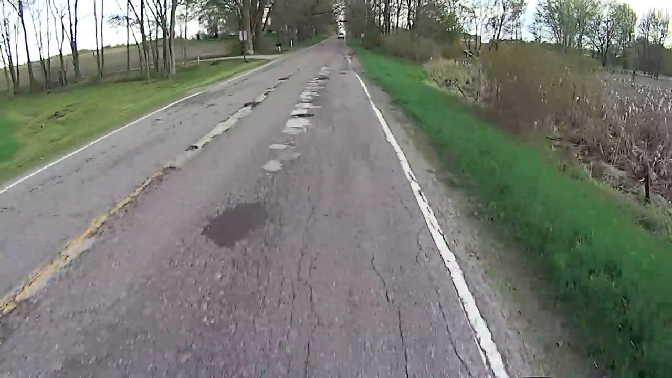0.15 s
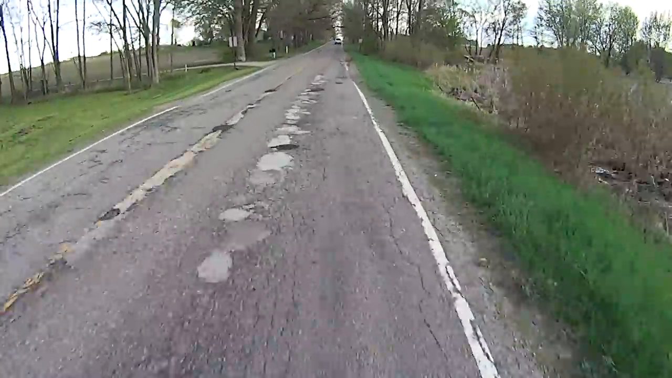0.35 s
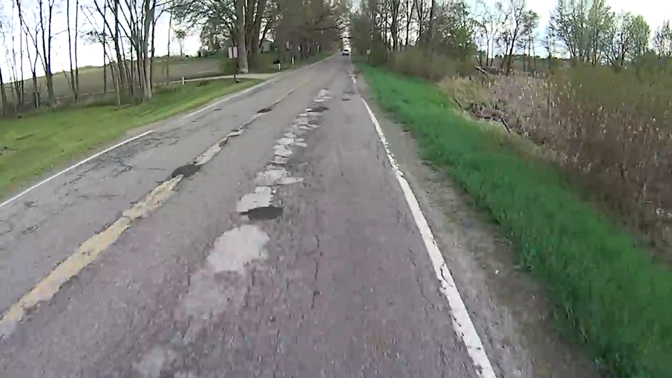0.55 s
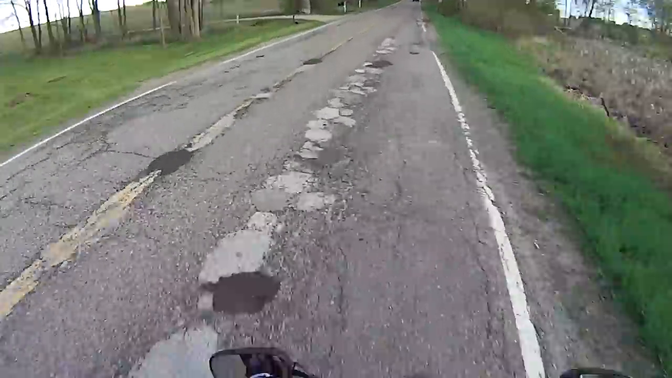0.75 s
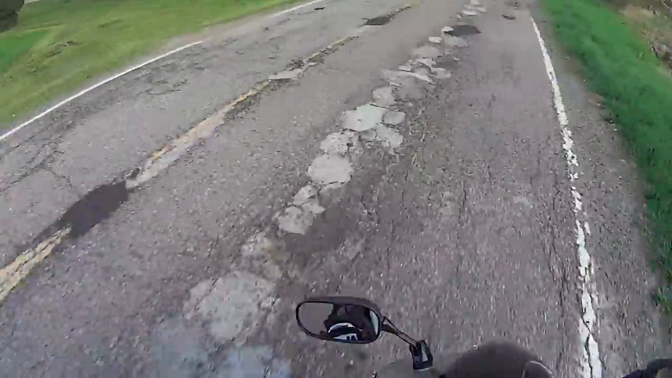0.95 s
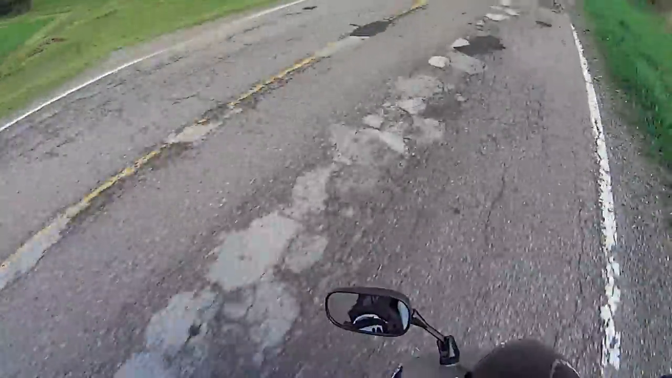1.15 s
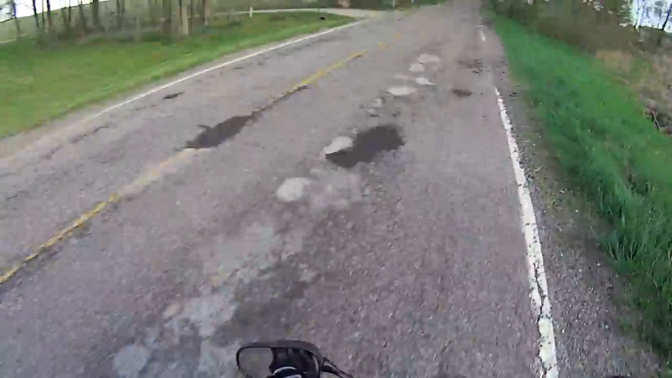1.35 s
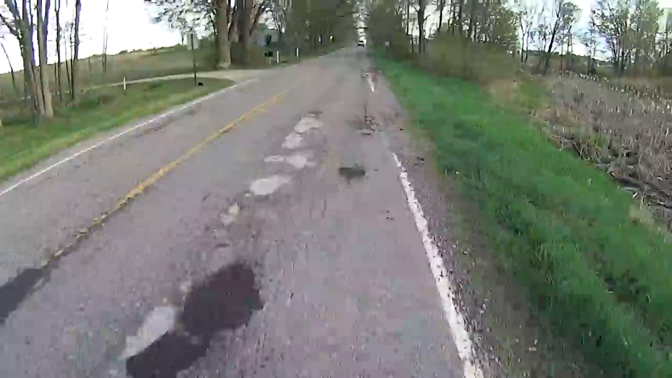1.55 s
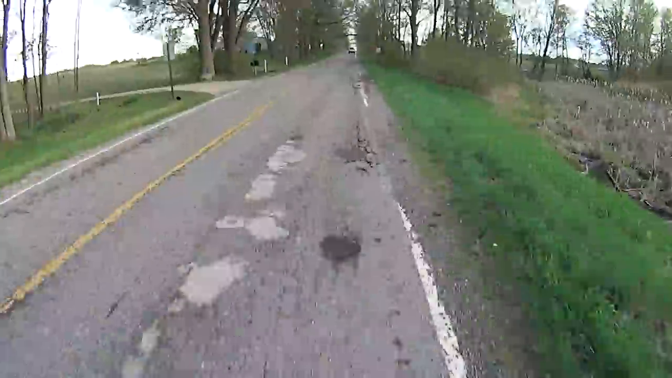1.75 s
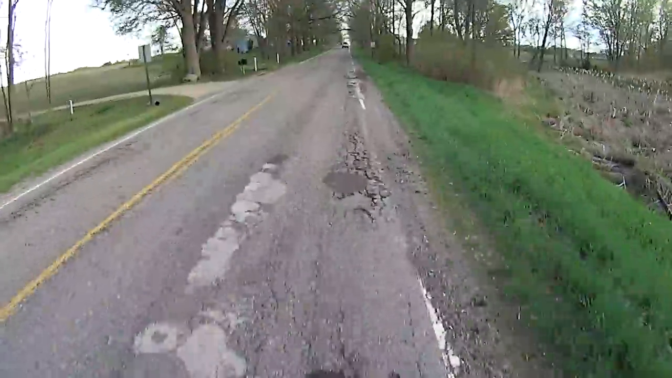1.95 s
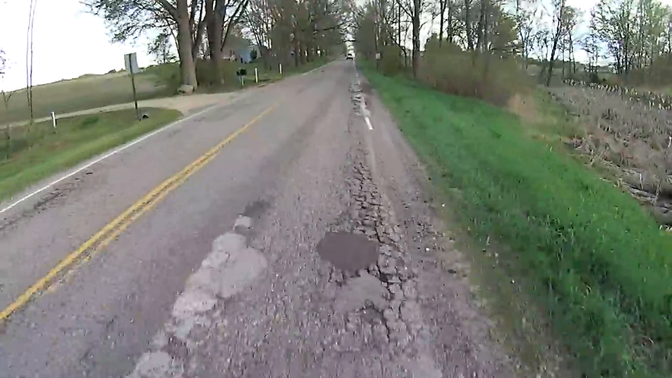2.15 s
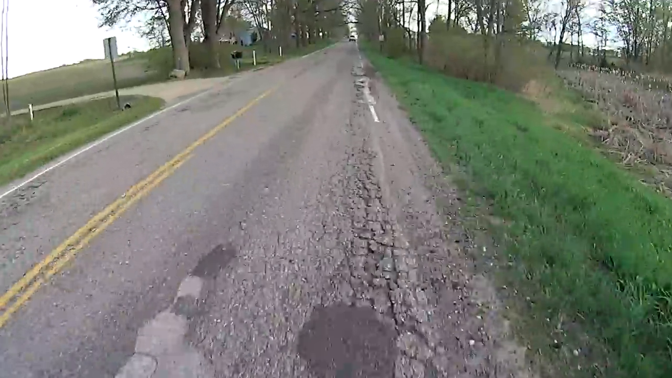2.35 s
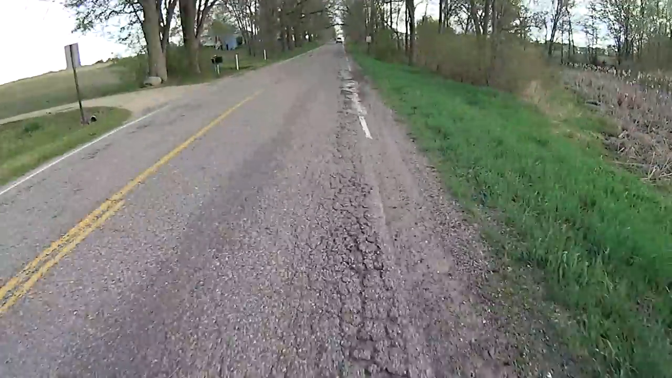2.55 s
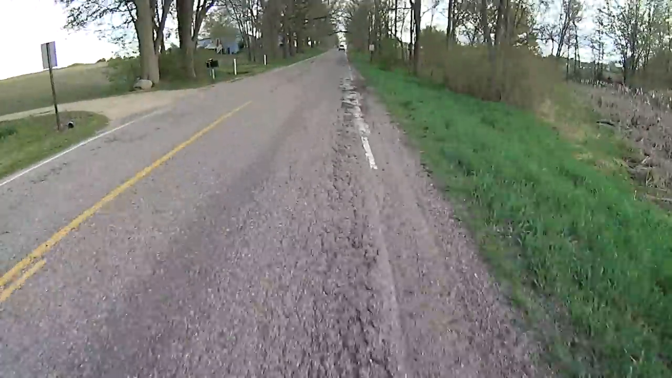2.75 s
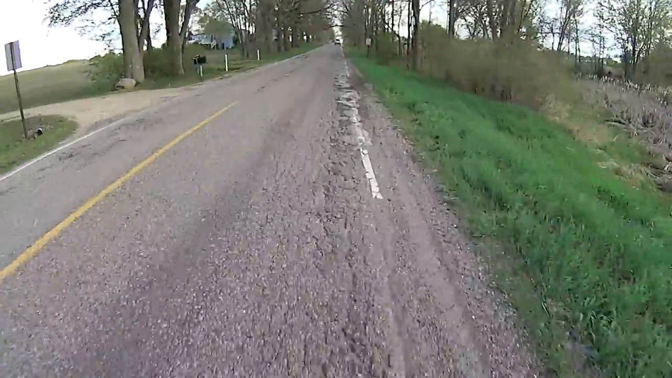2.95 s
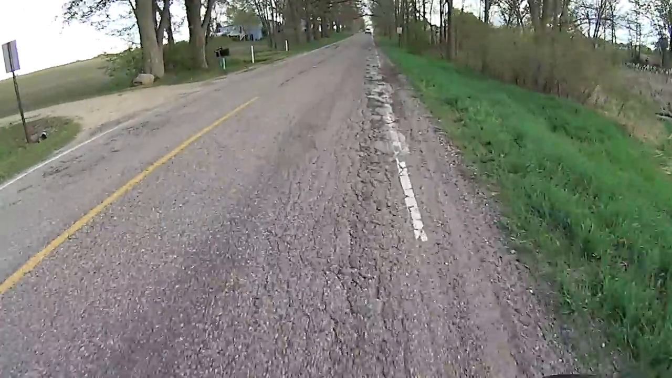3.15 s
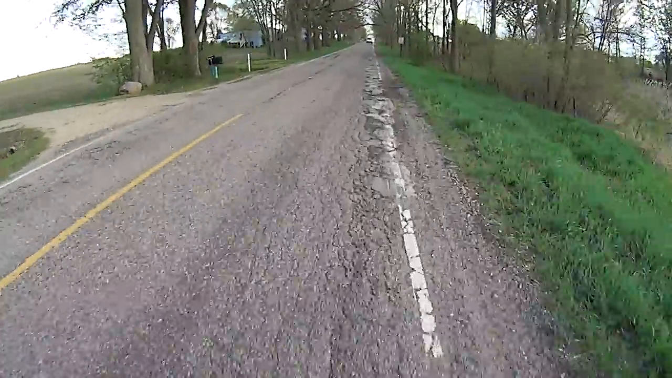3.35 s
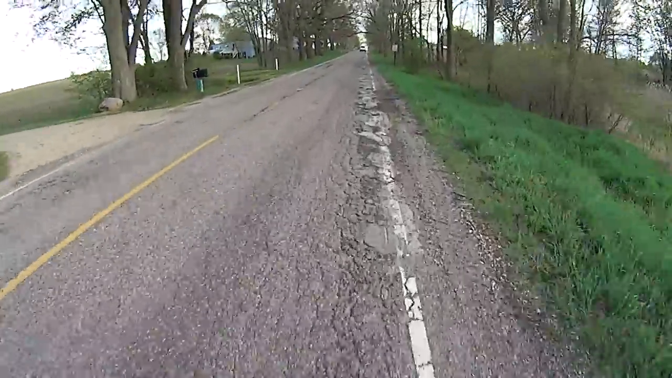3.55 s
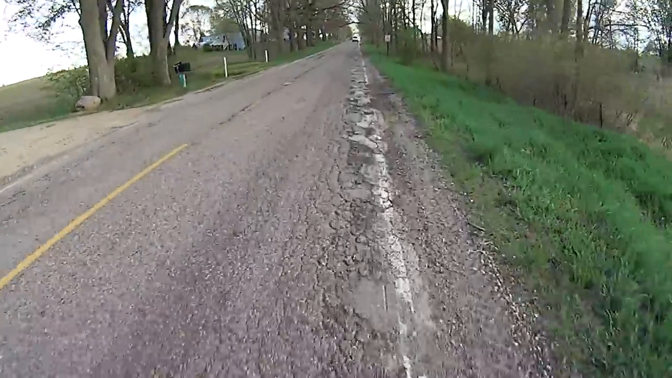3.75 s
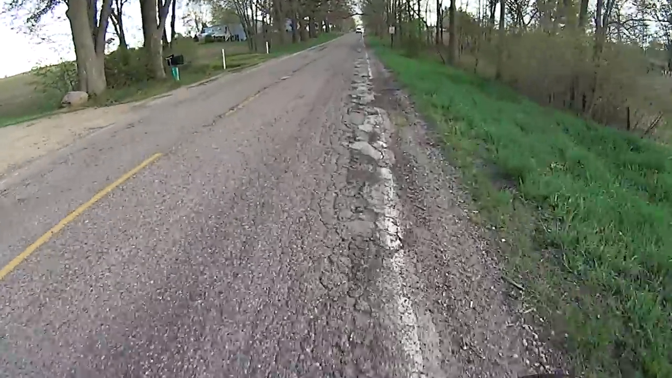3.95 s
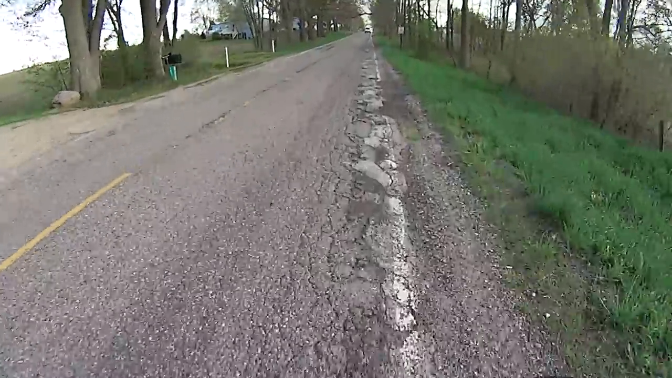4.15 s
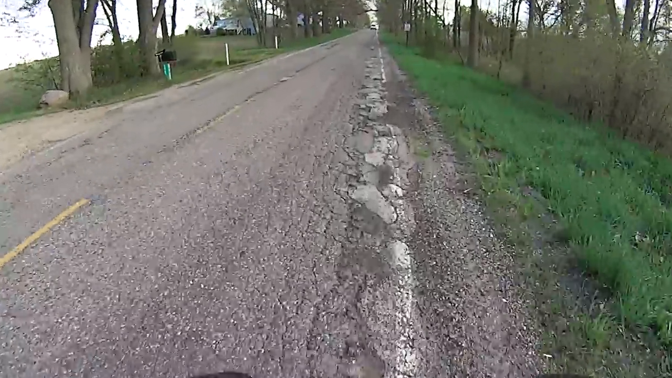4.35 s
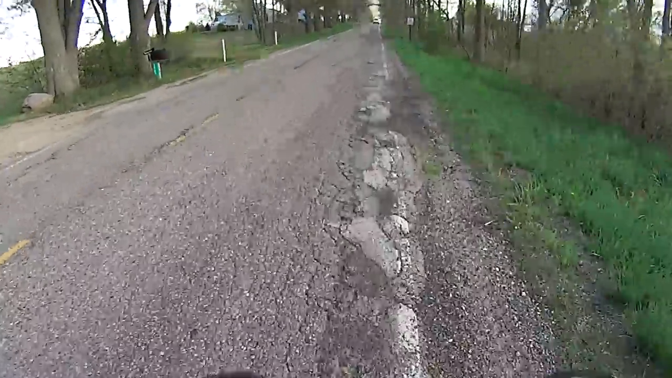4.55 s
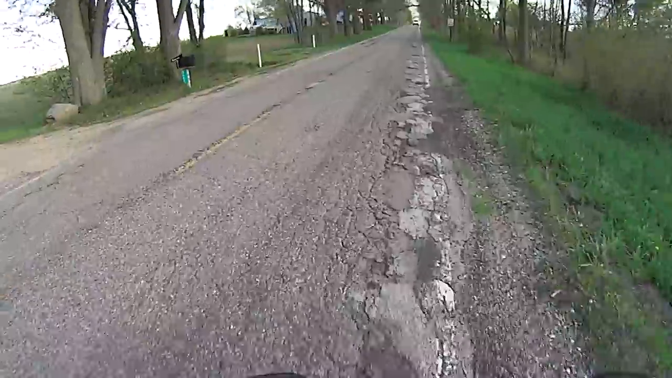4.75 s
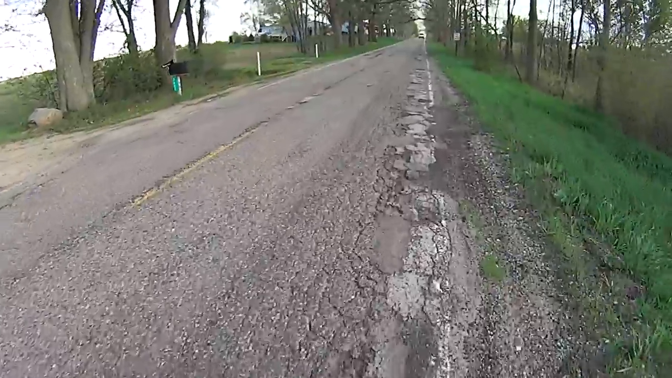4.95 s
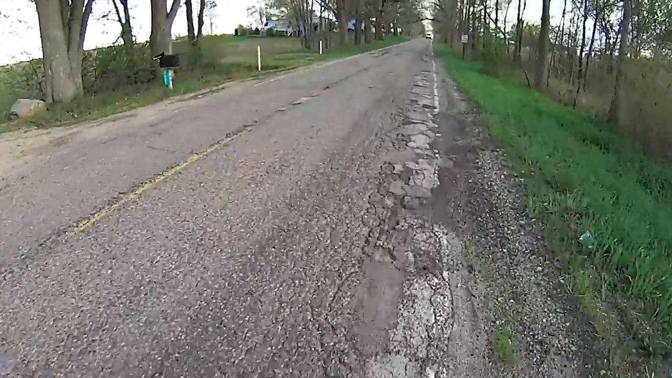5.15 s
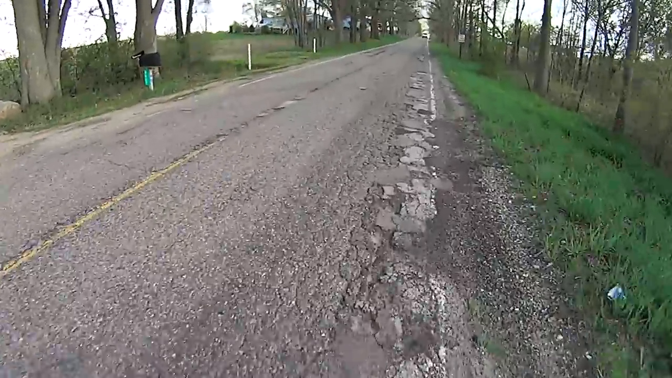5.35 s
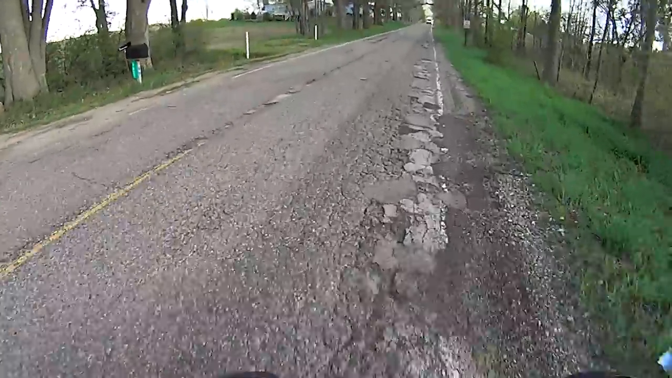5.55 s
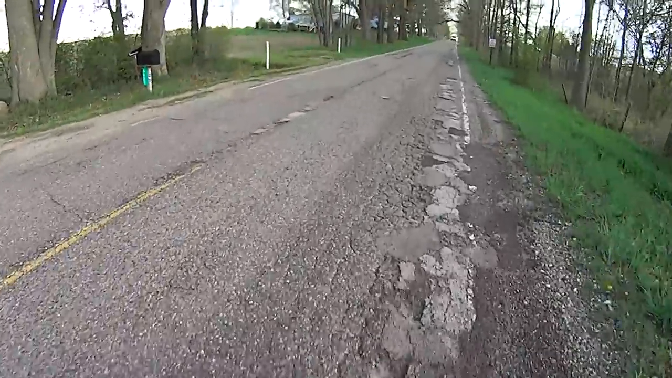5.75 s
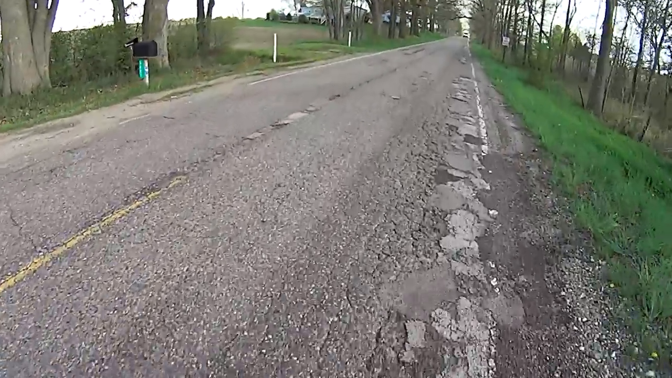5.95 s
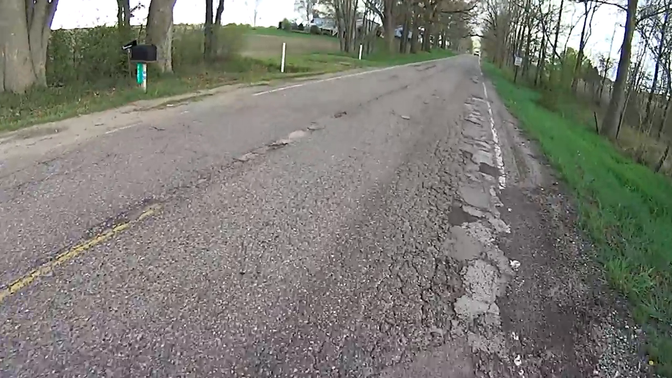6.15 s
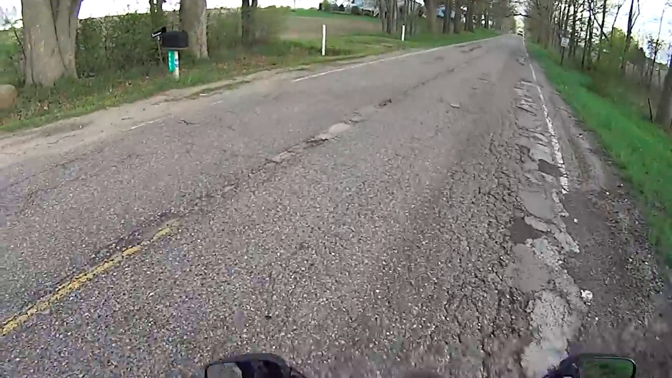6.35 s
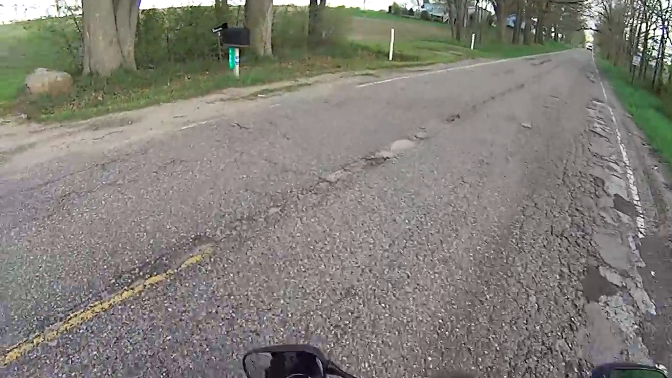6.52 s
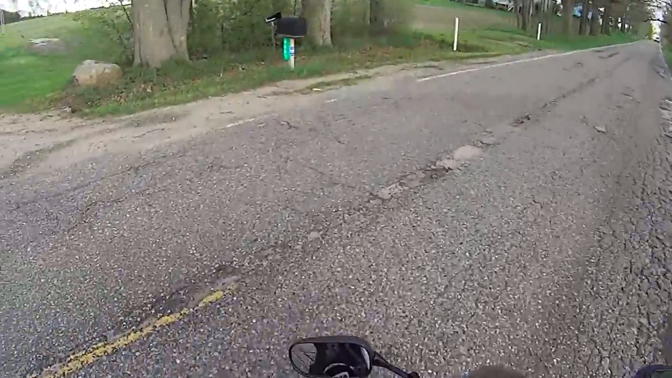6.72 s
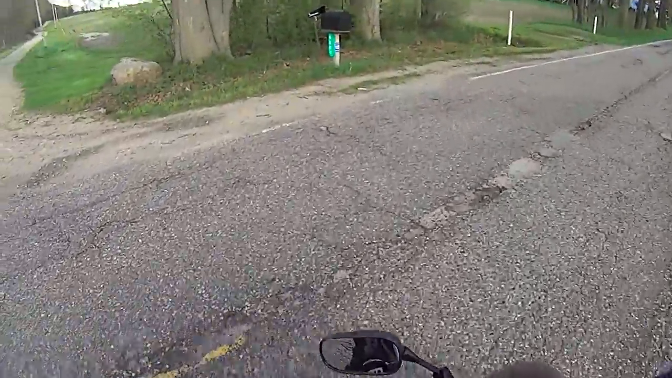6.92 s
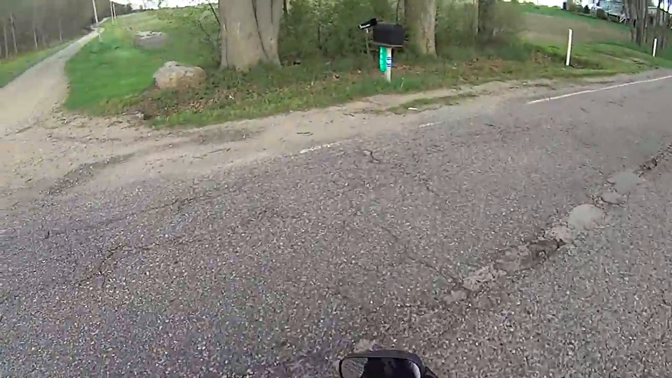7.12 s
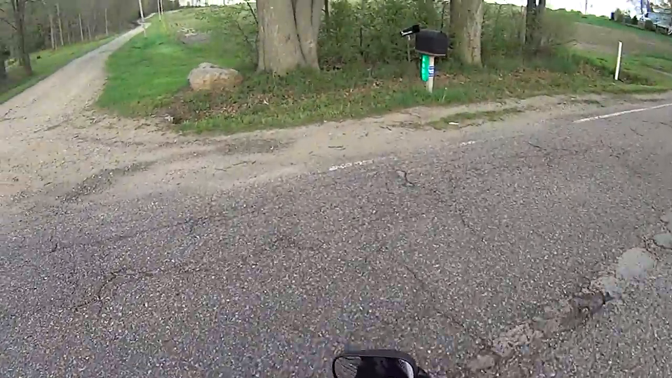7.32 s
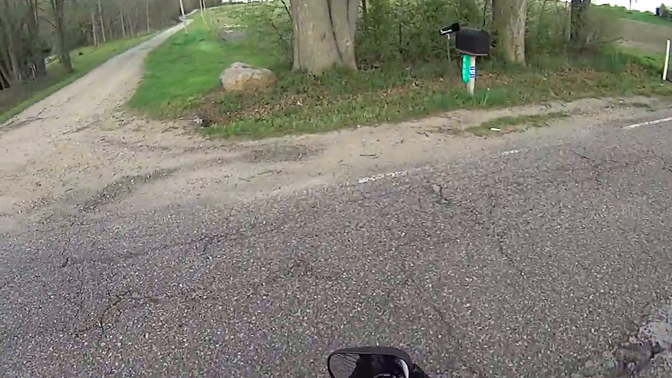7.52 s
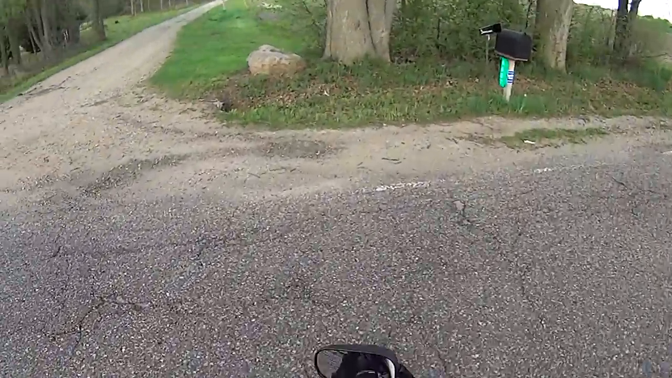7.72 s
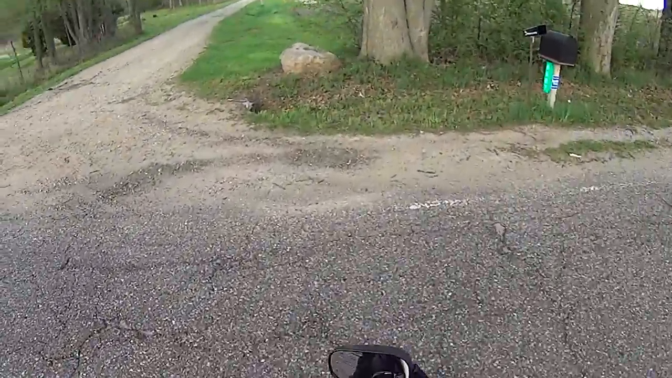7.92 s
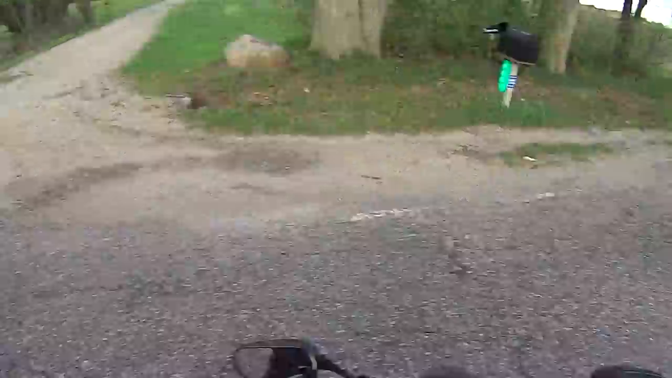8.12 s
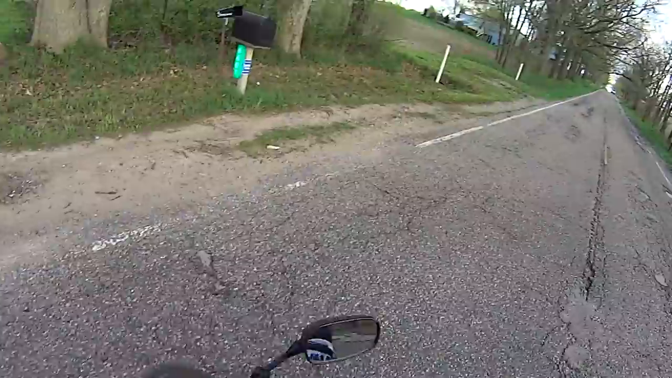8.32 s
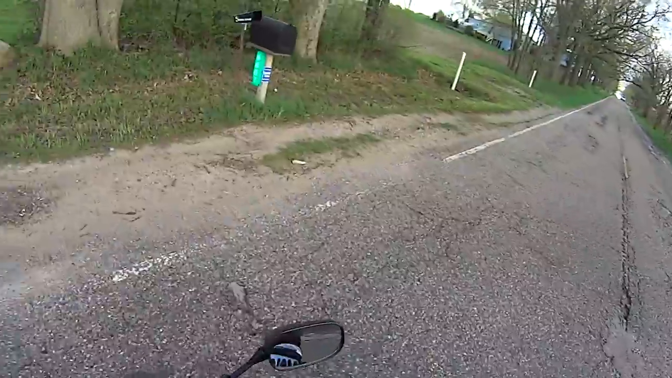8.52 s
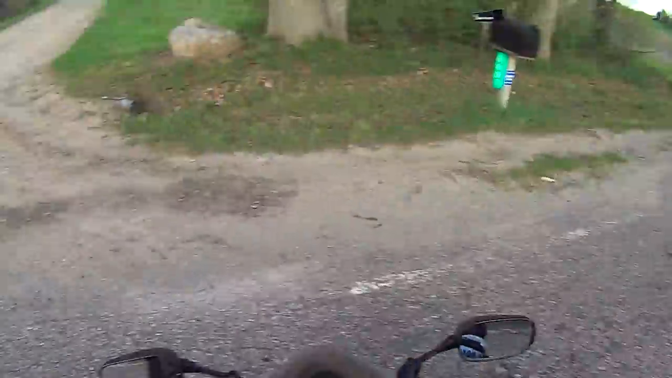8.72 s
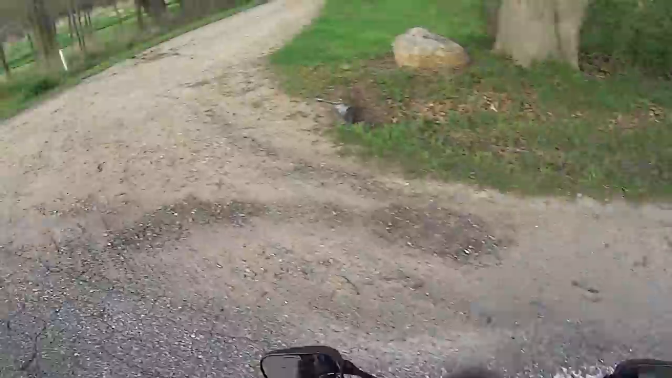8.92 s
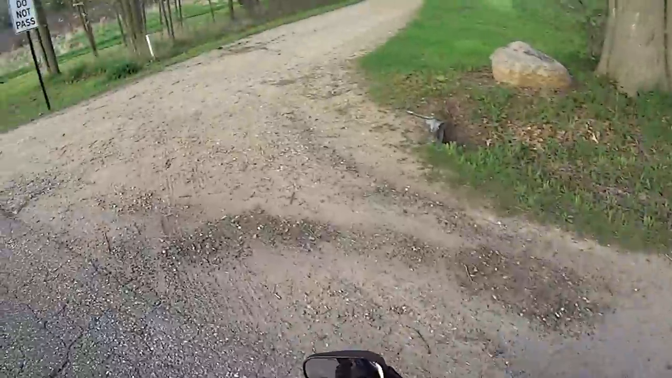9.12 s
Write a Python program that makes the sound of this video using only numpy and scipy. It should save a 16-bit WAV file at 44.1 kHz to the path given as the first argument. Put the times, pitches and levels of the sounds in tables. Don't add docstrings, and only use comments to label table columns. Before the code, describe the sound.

Fluttering air roars and whistles around a hard case, then dies to a thin swirl as a motorcycle brakes, with bumps, rattles and idling hum.

```python
import sys
import numpy as np
from scipy import signal
from scipy.fft import rfft, irfft, next_fast_len
from scipy.io import wavfile
from scipy.ndimage import uniform_filter1d

SR = 44100
rng = np.random.default_rng(int(sys.argv[2]) if len(sys.argv) > 2 else 0)


def elevation(decibels):
    levels = np.asarray(decibels, float)
    return 10 ** (levels / 20)


def transcribe(u):
    v = np.clip(np.atleast_2d(u).T, -1, 1)
    q = np.round(v * 32767).astype(np.int16)
    wavfile.write(sys.argv[1], SR, q)


N = 404827
TIME = np.arange(N) / SR
OPPOSED = np.array([[1], [-1]])


def unit(x):
    return x / np.sqrt(np.mean(x ** 2))


def walk(rate):
    hold = int(SR / rate)
    steps = np.repeat(rng.standard_normal(N // hold + 1), hold)
    return unit(uniform_filter1d(uniform_filter1d(steps, hold), hold)[:N])


def colour(table, hz):
    f, db = np.transpose(table)
    return elevation(np.interp(np.log(hz), np.log(f), db))


# (frequency [Hz], left minus right level [dB], phase by which the right port leads [rad])
PORTS = [(60, -1, .6), (320, -2, .45), (400, 0, 1.6), (520, 1, 2.4), (800, 1, 1.3), (1040, 2.5, 1.9),
         (1140, 0, .4), (1640, -2, -.1), (2100, -4, 0), (2600, 3, -2.7), (3240, -.5, 0), (4150, 0, -2.3),
         (4660, -1, 0), (5100, -4, 0)]


def ring(drive, modes, order=2):
    size = next_fast_len(len(drive) + SR // 4)
    hz = np.arange(size // 2 + 1) * SR / size
    port_hz, port_pan_db, port_lead = np.transpose(PORTS)
    out = 0
    for f, width, db in modes:
        pan_db = np.interp(f, port_hz, port_pan_db)
        lead = np.interp(f, port_hz, port_lead) * (f < port_hz[-1])
        wide = width / 2 / np.sqrt(2 ** (1 / order) - 1)
        peak = (wide / (wide + 1j * (hz - f))) ** order * np.minimum(hz / f * 2, 1)
        gain = elevation(db + pan_db * OPPOSED / 2)
        out = out + peak * gain * np.array([[1], [np.exp(1j * lead)]])
    return irfft(out * rfft(drive, size), size)[:, :len(drive)]


def rush(modes, db, gate, flicker_db, rate):
    drive = rng.standard_normal(N) * gate * elevation(flicker_db * walk(rate))
    return unit(ring(drive, modes)) * elevation(db)


# (time [s], level [dB])
SWIRL = [(0.0, -25), (0.4, -23.5), (0.65, -25.5), (0.92, -24), (1.2, -24), (1.55, -26), (1.8, -24.5),
         (2.0, -29.5), (2.76, -29.5), (3.63, -31.5), (5.0, -32.5), (6.1, -33), (6.45, -31), (6.85, -32.5),
         (7.45, -35.5), (8.1, -34), (8.6, -32.5), (9.18, -34.5)]


def airflow():
    swirl_db = np.interp(TIME, *np.transpose(SWIRL)) + 32
    braking_s, sag_db_per_s = 1.43, 0.74
    wind_db = 20.5 * np.exp(-TIME / braking_s) - sag_db_per_s * TIME
    start_s, end_s, ease_s = .88, 1.47, 0.035
    glance = (np.tanh((TIME - start_s) / ease_s) - np.tanh((TIME - end_s) / (3 * ease_s))) / 2
    return swirl_db, wind_db, glance


# (time [s], firing rate [Hz], hum level [dB])
ENGINE = [(0.0, 56.2, -48), (0.3, 58, -59), (0.55, 54, -63), (0.8, 57.6, -46), (1.0, 60.4, -42.5),
          (1.28, 58.2, -42.5), (1.5, 54.5, -46.5), (1.62, 57.6, -54.5), (3.8, 56.4, -50.5),
          (4.3, 58.6, -58), (4.6, 55.5, -52), (4.8, 58.2, -57), (6.4, 55.6, -49.5), (7.1, 56.2, -49.5),
          (8.1, 56.1, -52.5), (8.44, 51.6, -51.5), (8.7, 53, -53.5), (8.86, 50.75, -52.5)]
# (multiple of the firing rate, level [dB])
ORDER = [(.5, -11), (1, 0), (1.5, -8), (2, -4.5), (3, -25), (4, -1), (4.5, -9), (5, -2.5), (6, -14)]
# (frequency [Hz], level [dB])
HELMET = [(25, -4), (55, -1), (105, 2), (165, -8), (207, -6), (225, 0), (238, 8), (255, 3), (285, -1),
          (340, -8), (700, -25)]


def engine():
    s, hz, db = np.transpose(ENGINE)
    hz = np.interp(TIME, s, hz) * (1 + 0.0046 * walk(20) + .009 * walk(5))
    phase = 2 * np.pi * np.cumsum(hz) / SR
    hum = 0
    for multiple, order_db in ORDER:
        gain = elevation(order_db + 2.0 * walk(9)) * colour(HELMET, multiple * hz)
        hum = hum + gain * np.sin(multiple * phase + 6 * rng.random())
    level = elevation(uniform_filter1d(np.interp(TIME, s, db), SR // 5))
    return np.sqrt(2) * level * np.array([0.87 * hum, np.roll(hum, -8)]), phase


def clatter_gate(phase):
    return elevation(1.74 * np.cos(phase) + 0.61 * np.cos(phase / 4))


# (frequency [Hz], width [Hz], level [dB])
BUFFET = [(60, 37, -13), (108.7, 45, -2.5), (173.3, 93, -1)]
# (frequency [Hz], width [Hz], level [dB])
SHELL = [(255.4, 62, -4), (447.7, 71, -1), (512, 71, 2), (739.6, 27, -9), (818, 160, -4.5), (1033, 67, 1.5)]
# (frequency [Hz], width [Hz], level [dB])
CAVITY = [(1163, 34, -12), (1505.5, 64, -10.5), (1642.3, 162, 0.5), (1784, 174, -8), (2054, 70, -9.5),
          (2591, 66, -16.5)]
# (frequency [Hz], width [Hz], level [dB])
PORT = [(4632, 116, -6), (4672, 76, -7), (5092, 140, 3), (5204, 216, -1.5)]


def case_air(swirl_db, wind_db, glance, clatter):
    buffet_db = -53 + 1.22 * swirl_db + 0.5 * wind_db + 4.5 * glance
    rumble_db = -41.5 + 0.37 * swirl_db + 0.53 * wind_db
    whistle_db = -50 + .25 * swirl_db + 0.99 * wind_db - 2.5 * glance
    air = rush(BUFFET, buffet_db, 1, 1.7, 7)
    air += rush(SHELL, rumble_db, clatter, 1.87, 11)
    air += rush(CAVITY, swirl_db - 32, clatter, 0.94, 20)
    air += rush(PORT, whistle_db, clatter, 0.67, 14)
    return air, whistle_db


def steady_flow(swirl_db, whistle_db, glance):
    flow_db = .7 * (swirl_db - 32) + 0.36 * (whistle_db + 21.5) + 0.5 * glance
    return uniform_filter1d(flow_db, SR // 4)


# (frequency [Hz], width [Hz], level [dB])
SLOT = [(2770, 670, -8.5), (3183, 210, 5.5), (3300, 80, -6), (4140, 520, -4.5)]
# (frequency [Hz], width [Hz], level [dB])
SEAMS = [(5800, 250, 5), (7110, 520, -1.5), (8170, 180, -15), (9230, 1300, -6.5)]
# (frequency [Hz], width [Hz], level [dB])
CATCH = [(7430, 160, 0.005)]


def gap_air(flow_db, swirl_db, clatter):
    air = rush(SLOT, flow_db - 18.5, clatter, 1.4, 20)
    air += rush(SEAMS, flow_db - 30.5, clatter, 2.6, 14) * OPPOSED
    return air + rush(CATCH, -62.5 + 0.96 * (swirl_db - 8), clatter, 3.5, 12)


# (frequency [Hz], density [dB per Hz])
LEAK = [(30, -6), (130, -22.5), (320, -2.5), (600, -7), (1250, -11), (1650, -1.5), (2350, -4.5),
        (2900, -4.5), (3700, -13.5), (4400, -26), (5700, -14), (6400, -20.5), (9500, -21.5), (10000, -40.5)]


def leak(flow_db):
    air = rfft(rng.standard_normal((2, N)) * elevation(1.64 * walk(14)))
    air = irfft(air * colour(LEAK, np.arange(N // 2 + 1) * SR / N + 1), N)
    hiss = rng.standard_normal((3, N))
    return unit(air) * elevation(flow_db - 12) + elevation(-58.5) * (hiss[0] + 0.62 * hiss[1:])


# (frequency [Hz], rms level [dB])
WHINE = [(6773, -78), (6714, -80)]


def whine():
    return sum(np.sqrt(2) * elevation(db) * np.sin(2 * np.pi * hz * TIME) for hz, db in WHINE)


# (frequency [Hz], width [Hz], level [dB])
VALVES = [(2526, 52, 0)]


def valve_gear(clatter):
    middle_s, half_length_s = 7.7, 0.61
    tipped = np.exp(-((TIME - middle_s) / half_length_s) ** 4)
    return rush(VALVES, -57.5, clatter, 1.5, 5) * OPPOSED * (0.32 + tipped)


# (time [s], peak level [dB], length [s])
BUMPS = [(0.02, -40, .08), (0.25, -28.5, 0.11), (0.4, -34, .1), (0.534, -31, .1), (0.662, -31, 0.085),
         (0.808, -22.5, 0.047), (1.4, -43, .15), (1.7, -45, .25), (1.997, -35, .07), (2.18, -41, 0.23),
         (2.6, -36.5, 0.17), (2.854, -36.5, 0.26), (3.25, -38, 0.13), (3.45, -38, .1), (3.84, -40, 0.086),
         (4.27, -35, .08), (4.42, -24, .05), (4.555, -28, 0.046), (4.69, -36, 0.2), (4.93, -41, 0.12),
         (5.093, -36, .06), (5.303, -33.5, 0.11), (5.47, -36, .06), (5.712, -40, 0.18), (6.24, -30.5, 0.12),
         (6.42, -34, .08), (6.505, -28, 0.14), (6.75, -50, .1), (8.283, -39, 0.071)]


def rocking():
    s, db, length_s = np.array(BUMPS).T[:, :, None]
    t = TIME[::64]
    fall_db = 11.5
    power = np.sum(elevation(db - fall_db * ((t - s) * 2 / length_s) ** 2) ** 2, axis=0)
    return np.interp(TIME, t, power)


# (frequency [Hz], width [Hz], level [dB])
MOUNT = [(30, 13, -11), (70, 11.4, 0)]


def mount_shake(swirl_db, wind_db):
    bumps = rocking()
    tremble_db = -54.5 + .3 * swirl_db + .4 * wind_db
    shake_db = 10 * np.log10(bumps / 2 + elevation(tremble_db) ** 2)
    swing_phase = 2 * np.pi * np.cumsum(MOUNT[1][0] * (1 + .04 * walk(6))) / SR
    swing = np.sin(swing_phase + np.array([[0], [.6]]))
    return rush(MOUNT, shake_db - 4.0, 1, .8, 5.3) + swing * np.sqrt(2 * bumps) * elevation(-8)


def blows(times, db, length_s, rattle, tail_db):
    age = np.arange(4096) / SR
    burst = np.exp(-age / length_s) * np.minimum(age / (0.63 * length_s), 1)
    push = burst * (1 - rattle)
    rattling = burst * rattle + elevation(tail_db) * np.exp(-age / (10 * length_s))
    chance = rng.standard_normal((len(times), 4096))
    out = np.zeros(N + 4096)
    for t, gain, noise in zip(times, elevation(db), chance):
        i = int(t * SR)
        out[i:i + 4096] += gain * (push + rattling * noise) / np.sum(burst ** 2) ** .5
    return out[:N]


def struck(times, db, modes, length_s, rattle=0.29, tail_db=-24, order=1):
    click = ring(signal.unit_impulse(SR // 4), modes, order)
    return ring(blows(times, db, length_s, rattle, tail_db), modes, order) / np.abs(click.mean(axis=0)).max()


def strays(swirl_db, count=30):
    chance = rng.random((count, 2))
    s = (np.arange(count) + chance[:, 0]) * (TIME[-1] - .1) / count
    db = -26.5 + .6 * np.interp(s, TIME, swirl_db) + 6.5 * (2 * chance[:, 1] - 1)
    return np.transpose([s, db, np.full(count, -21.0)])


# (time [s], peak level [dB], brightness [dB])
TICKS = [(0.1761, -11.5, -20.5), (0.5686, -9, -23), (0.825, -11.5, -25), (0.8976, -13.5, -21),
         (1.0216, -13.5, -26), (1.1598, -9, -27), (1.2503, -10.5, -24), (1.3274, -11.5, -24),
         (1.7085, -11.5, -18), (1.8276, -16, -17), (2.1261, -17.5, -22), (2.2014, -7.5, -28),
         (2.367, -14.5, -21), (2.4491, -9.5, -19.5), (2.7107, -11, -20), (2.792, -16.5, -26),
         (2.868, -16, -24), (3.0357, -15.5, -23), (3.1121, -11.5, -22.5), (3.3129, -16, -26),
         (3.4278, -18, -19), (3.707, -14.5, -24), (3.7843, -16, -17.5), (4.2852, -20, -23),
         (4.5341, -14.5, -21.5), (4.6322, -15.5, -18.5), (6.0476, -9, -24), (6.2425, -19, -17),
         (6.3116, -15.5, -22), (6.3924, -12.5, -23)]
# (time [s], peak level [dB])
CHINKS = [(1.5796, -52), (1.655, -56), (1.7064, -45), (1.7852, -44.5), (1.8286, -62), (1.9782, -56),
          (2.24, -50), (2.3289, -47), (2.4485, -46), (2.538, -56), (2.6078, -58), (2.6941, -46),
          (2.8069, -50), (3.1032, -51), (3.169, -58), (3.3601, -49), (3.4324, -47), (3.5876, -52),
          (4.3756, -49), (4.5589, -53), (4.9195, -55), (5.1675, -55), (5.9597, -49), (6.0385, -49),
          (6.1508, -50), (6.3284, -49), (6.3628, -55), (6.4531, -55), (6.6057, -58), (6.8886, -56)]


def ticks(faint):
    s, db, bright_db = np.vstack([TICKS, faint]).T
    taps = struck(s, db - 9, CAVITY[1:3], 0.00016, rattle=0.069, tail_db=-12, order=2)
    taps += struck(s, db - 5.5, CAVITY[1:4], 0.0047, rattle=1.0, tail_db=-17, order=2)
    taps += struck(s, db + bright_db + 3.5, PORT + SLOT, 0.0038, rattle=0.94, tail_db=-15.5, order=2)
    taps += struck(s, db + bright_db - 10, SEAMS, .003, rattle=0.79, tail_db=-12, order=2) * OPPOSED
    taps += struck(s, db - 21, SHELL[1:], 0.0088, rattle=0.77, tail_db=-7.5, order=2)
    s, db = np.transpose(CHINKS)
    return taps + struck(s, db + 13, CATCH + SEAMS[1:2], 0.016, rattle=0.63, tail_db=-28, order=2)


# (time [s], peak level [dB], then against it: thud [dB], knock [dB], crack [dB])
KNOCKS = [(0.806, -13.5, -7, -7.5, -9), (0.832, -23, -16, -3, -11), (0.858, -20.5, -15, -13, -13),
          (1.002, -29, -12, -9, 9), (1.297, -30.5, -10, 8.5, -13), (2.203, -32.5, -1, -9.5, -13),
          (2.576, -30, -3, -2, -6), (3.078, -37, -10, -13, -8), (4.407, -10.5, -24, -24, -5.5),
          (4.549, -11.5, -16, -5, -12), (4.624, -26, -10, -2.5, -23), (5.279, -27, -19, -4, -19),
          (5.986, -34, -15, -14, -12), (6.037, -40, -15, -2, -9), (6.424, -28, -4, -4, -18),
          (7.868, -36, -13, -7, -9), (8.114, -34.5, -18, -12, 2), (8.473, -35, -19, 1.5, -12)]
# (frequency [Hz], width [Hz], level [dB])
RING = [(421, 59.5, 8), (499, 72, -3.5), (326, 58, -6)]
# (frequency [Hz], width [Hz], level [dB])
KNOCK = [(221.6, 46, 0)]
# (frequency [Hz], width [Hz], level [dB])
THUD = [(35, 30, -15), (71, 28, -4), (132, 60, -7)]
# (frequency [Hz], width [Hz], level [dB])
CRACK = [(778, 67, 2), (970, 110, 2), (1140, 220, -11)]


def knocks():
    s, db, thud_db, knock_db, crack_db = np.transpose(KNOCKS)
    hits = struck(s, db + thud_db - 0.5, THUD, 0.0094)
    hits += struck(s, db + knock_db - 9.5, KNOCK, 0.00039)
    hits += struck(s - .004, db + crack_db - 2.5, CRACK, 0.00046, rattle=0.22, tail_db=-9.5)
    hits += struck(s - .003, db - 11.5, RING, 0.00054, rattle=0.34, tail_db=-12.0, order=2)
    dulling = signal.butter(3, 1500, fs=SR, output="sos")
    return signal.sosfilt(dulling, hits)


def glance_puff(glance, clatter):
    peak_s = 1.23
    return rush(CAVITY[2:3], -25.5, clatter, 1.7, 17.6) * glance * np.minimum(TIME / peak_s, 1)


# (time [s], frequency [Hz], level [dB])
EDDY = [
    (1.15, 150, -60),
    (1.25, 134.7, -39),
    (1.4, 125, -43),
    (1.52, 99.3, -45.5),
    (1.92, 74.5, -42),
    (2.1, 67.7, -51),
    (2.3, 65.7, -45),
    (2.6, 63.4, -60),
]


def eddies():
    s, hz, db = np.transpose(EDDY)
    phase = 2 * np.pi * np.cumsum(np.interp(TIME, s, hz) * (1 + 0.0385 * walk(26))) / SR
    level = elevation(np.interp(TIME, s, db, left=-99, right=-99) + 4.3 * walk(24))
    return np.sqrt(2) * level * np.sin([phase, phase + .3])


def scene():
    swirl_db, wind_db, glance = airflow()
    hum, phase = engine()
    clatter = clatter_gate(phase)
    air, whistle_db = case_air(swirl_db, wind_db, glance, clatter)
    flow_db = steady_flow(swirl_db, whistle_db, glance)
    air += gap_air(flow_db, swirl_db, clatter) + leak(flow_db)
    air += glance_puff(glance, clatter) + eddies()
    machine = hum + valve_gear(clatter) + whine()
    hits = mount_shake(swirl_db, wind_db) + ticks(strays(swirl_db)) + knocks()
    return air + machine + hits


def low_pass(x):
    return signal.sosfilt(signal.butter(12, 11040, fs=SR, output="sos"), x)


def record(dry):
    top = signal.ellip(10, .2, 50, 11030, fs=SR, output="sos")
    mix = signal.sosfilt(top, dry)
    return low_pass(mix)


dry = scene()
out = record(dry)
transcribe(out)
```